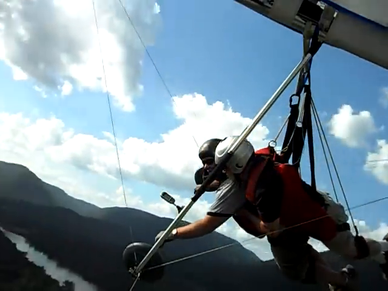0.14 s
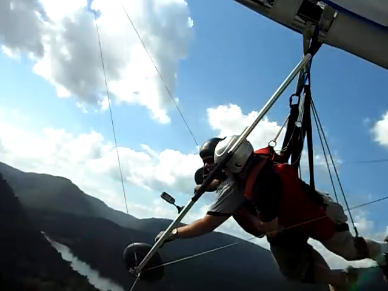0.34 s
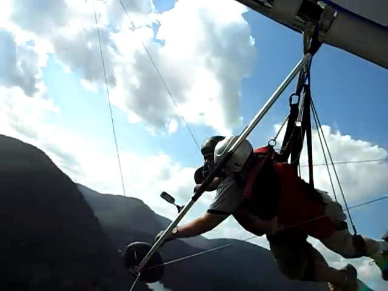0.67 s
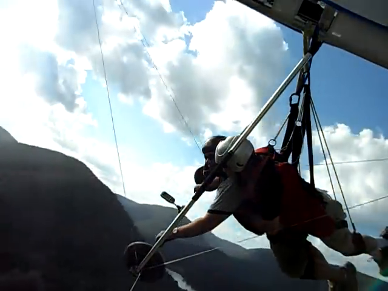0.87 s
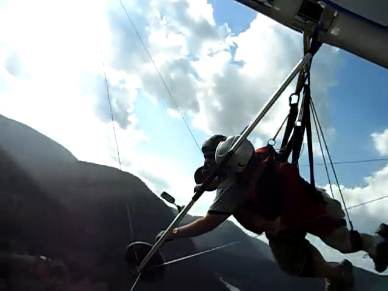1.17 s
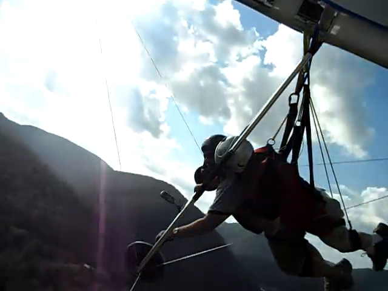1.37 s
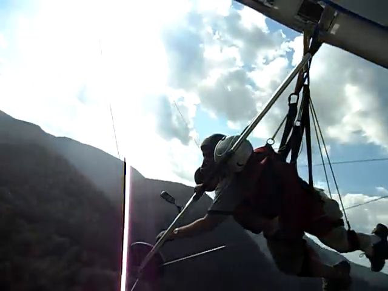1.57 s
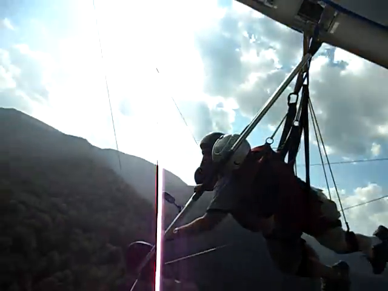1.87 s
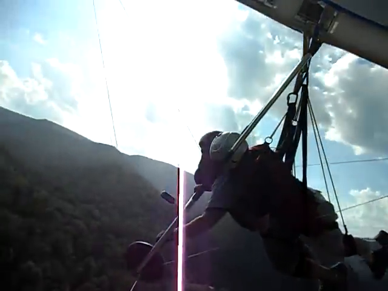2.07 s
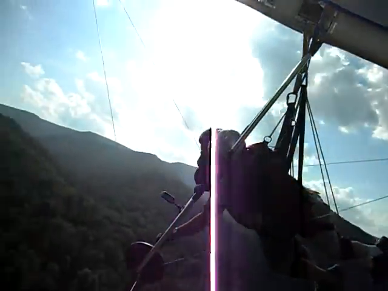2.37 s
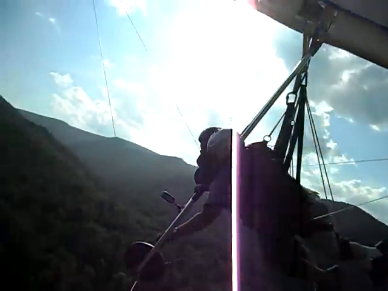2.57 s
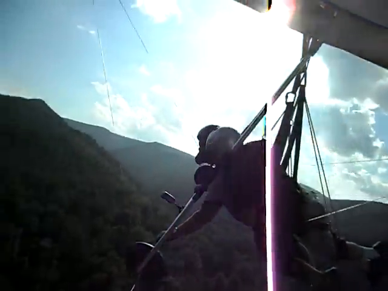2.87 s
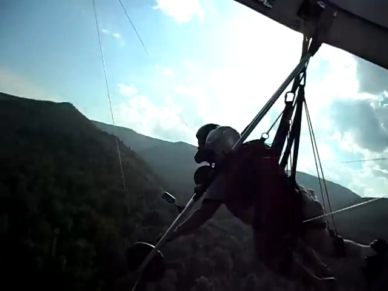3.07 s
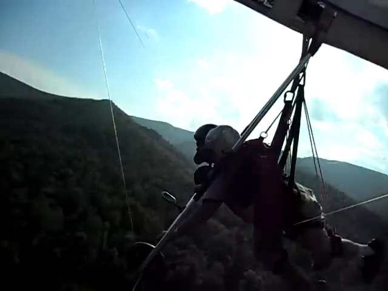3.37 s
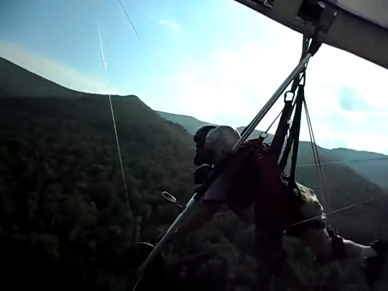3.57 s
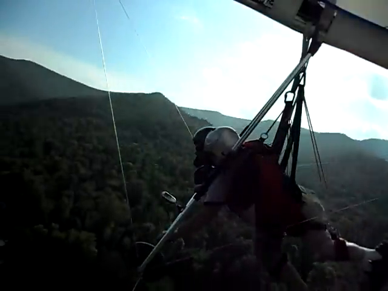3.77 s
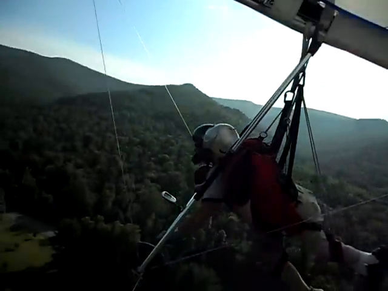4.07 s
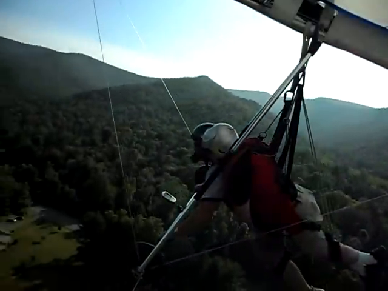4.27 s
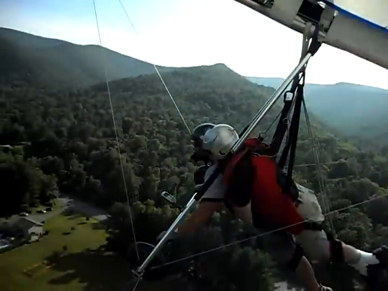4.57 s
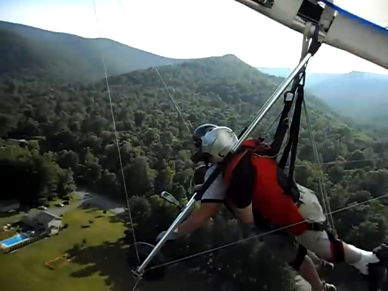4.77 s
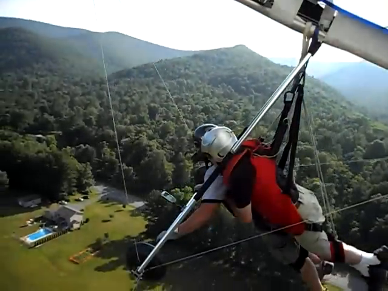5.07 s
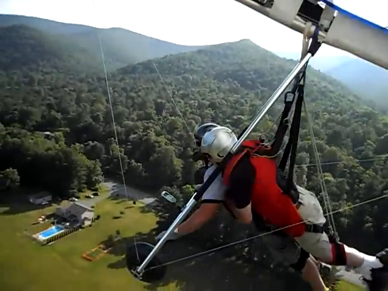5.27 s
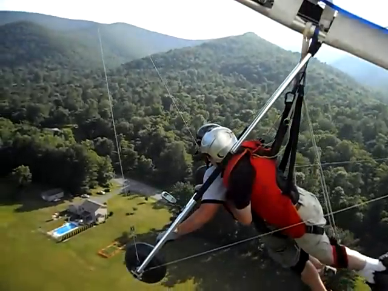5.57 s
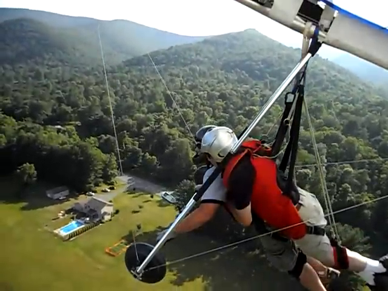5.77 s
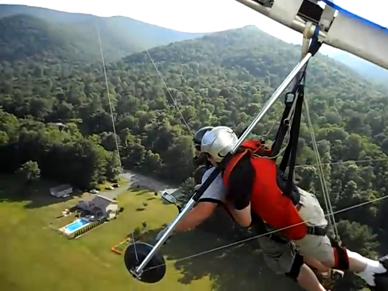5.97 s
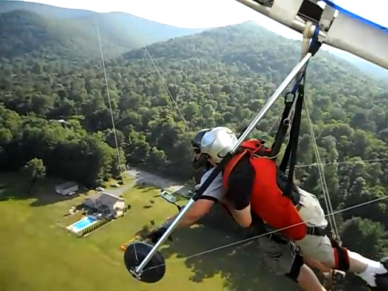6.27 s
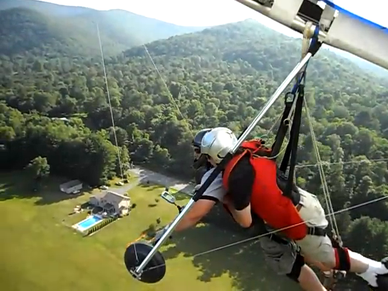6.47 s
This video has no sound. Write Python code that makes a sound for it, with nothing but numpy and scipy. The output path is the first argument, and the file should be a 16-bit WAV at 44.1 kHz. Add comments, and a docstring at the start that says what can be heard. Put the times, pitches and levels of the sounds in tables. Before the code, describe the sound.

Airflow buffets a microphone high in the air, a dull rush that brightens, crackles faintly and briefly breaks into separate gusts.

```python
"""A dull, fluttering rush of wind opens and soon brightens: airflow buffets the microphone of a camera
fixed to a hang glider in flight. Large eddies thump on the port and break into smaller ones, so the
rush sizzles and crackles on their pressure crests. Now and then a sharp pressure spike ticks.
Past the middle the stream breaks into low buffeting, then into separate gusts, and at last settles."""
import sys
import numpy as np
from scipy import signal
from scipy.fft import rfft, irfft
from scipy.io import wavfile
from scipy.ndimage import uniform_filter1d

SR = 44100
rng = np.random.default_rng(int(sys.argv[2]) if len(sys.argv) > 2 else 0)


def transcribe(signal):
    """Save signal, clipped to [-1, 1], as a 16-bit WAV file at the path in sys.argv[1]."""
    frames = np.atleast_2d(signal).T
    limited = np.clip(frames, -1, 1)
    pcm = np.round(limited * 32767).astype(np.int16)
    wavfile.write(sys.argv[1], SR, pcm)


N = 292439
TIME, BINS = np.arange(N) / SR, np.fft.rfftfreq(N, 1 / SR)
CLOCK = TIME[::32]  # coarser time steps for the slow controls

# Strength of the steady stream at the port: (time [s], relative level [dB])
STREAM_LEVEL = [(0, -1.5), (.17, -2), (.22, 1), (.3, 2), (.35, 0.5), (.5, 1), (.57, 3), (.64, 0), (.86, 1),
                (.91, 1), (.99, 3), (1.015, -5), (1.045, -2), (1.08, 0.5), (1.2, 1.5), (1.28, 0.8),
                (1.46, 1), (1.57, -1), (1.66, 1.5), (1.73, -3.5), (1.78, 3.5), (1.85, -0.6), (1.93, 1),
                (2.08, 1), (2.115, -4), (2.19, -2.5), (2.23, -0.5), (2.33, -2.5), (2.49, -0.5), (2.53, -4),
                (2.61, -4.5), (2.69, -2), (2.76, -2), (2.82, 0.7), (3.0, 1), (3.15, -1.2), (3.32, -0.1),
                (3.39, -2.5), (3.45, 2.5), (3.52, -1.5), (3.57, -4), (3.61, 1), (3.69, -2), (3.739, 4.5),
                (3.747, -4.5), (3.83, 0.5), (3.875, -4.5), (3.92, -2.5), (3.97, 0), (4.04, -2), (4.1, 2.5),
                (4.32, 2.5), (4.39, 0.5), (4.47, 3.5), (4.56, 0.5), (4.61, -0.8), (4.7, -1.5), (4.75, -1.5),
                (4.94, 0), (4.99, -3.5), (5.2, -1), (5.25, -4.5), (5.32, -1.5), (5.45, -10), (6.035, -9),
                (6.065, -1.5), (6.17, 0), (6.205, -3.5), (6.24, 0), (6.45, 2.5), (6.51, -2), (6.56, 1.5),
                (6.63, -3)]
# Mean spectrum of the wind pressure: (frequency [Hz], relative spectral density [dB])
WIND_SPECTRUM = [(5, -30.5), (18, -6), (40, -3), (85, 1), (200, 0), (300, -2), (420, -5), (700, -8),
                 (1050, -10.5), (1400, -14), (2300, -20.5), (3300, -31), (5000, -44), (7000, -59),
                 (10300, -76.5)]
# Spectral slope of the rush above ROAR_HZ: (time [s], tilt [dB/octave])
TREBLE_TILT = [(0.0, -7), (0.6, -6), (0.9, -3), (1.2, -0.8), (3.3, 2), (5.0, 0.5), (6.63, 0.06)]
# Single large eddies: (start [s], duration [s], relative level [dB], corner frequency [Hz])
EDDY_THUMPS = [(0.066, 0.12, -1, 219.4), (0.315, 0.043, 2, 220), (2.222, 0.063, 2.5, 259),
               (2.427, 0.06, 3, 200), (2.982, 0.17, 1, 261), (3.27, 0.099, 1.5, 301),
               (3.583, 0.055, 2, 199), (3.712, 0.085, 6.5, 301), (3.811, .035, 2.5, 260),
               (3.955, .1, -0.5, 301), (4.07, 0.25, 0.5, 300), (4.323, 0.071, -2, 299),
               (4.404, 0.048, 5.5, 340), (4.48, 0.16, -1.5, 260), (4.68, 0.077, 0, 320),
               (4.768, 0.055, 2.5, 320), (4.871, .075, 2.5, 299), (5.03, .06, 0.5, 260),
               (5.137, 0.037, 8.5, 261), (5.286, 0.12, 0.5, 240), (5.503, 0.035, -0.5, 220),
               (5.621, 0.067, 4.5, 200), (5.772, 0.051, 7.5, 211), (5.889, .068, 8.5, 190)]
# Tallest pressure spikes: (time [s], peak level in the tick band [dB], corner frequency [Hz])
PRESSURE_SPIKES = [(0.092, -51, 3500), (0.3049, -36.5, 7000), (0.559, -36.5, 8000), (0.5775, -49, 4000),
                   (0.603, -45, 4500), (0.765, -49, 9000), (0.8314, -42, 5500), (0.8539, -38.5, 7500),
                   (0.9655, -40, 7000), (0.9885, -34, 5500), (1.2415, -37, 4400), (1.324, -38, 10000),
                   (1.4436, -40, 5000), (1.4768, -33, 7500), (1.509, -35.5, 4800), (1.549, -45, 12000),
                   (1.8097, -35, 4500), (1.962, -37, 6500), (2.0849, -36.5, 13000), (2.0935, -40, 4500),
                   (2.21, -43, 4500), (2.242, -38, 7500), (2.4932, -34, 6500), (2.902, -36, 5000),
                   (2.9953, -35, 5500), (3.1146, -42, 12000), (3.2067, -40, 4000), (3.319, -41, 12000),
                   (3.4248, -38, 4500), (3.5117, -39, 4500), (3.7226, -37, 4500), (3.7728, -35, 9000),
                   (3.8284, -43, 8000), (4.1296, -36, 5500), (4.2931, -36, 8000), (4.5619, -36, 7000),
                   (4.6314, -39, 5000), (4.6654, -35, 6000), (4.775, -37, 5000), (4.8793, -39, 5500),
                   (5.0508, -38, 5500), (5.1587, -44, 10000), (5.3815, -34, 6000), (5.5333, -39, 5500),
                   (5.6615, -39, 5500), (5.7959, -40, 7000), (5.9184, -37, 4500), (6.4847, -36.5, 9000),
                   (6.5122, -40, 5500)]
# Gusts on top of the stream: (start [s], duration [s], relative level [dB], tilt [dB/octave])
GUST_EVENTS = [(0.938, 0.045, 4.5, 1.5), (1.433, 0.053, -0.5, -0.5), (1.604, 0.036, -5.5, -2),
               (1.861, 0.031, -1, 2), (2.394, 0.032, -2, 3), (2.897, 0.051, -6.5, 1),
               (3.194, 0.051, -5, 1.5), (3.267, 0.093, -5.5, 0), (3.637, 0.039, 3, 1),
               (3.697, 0.046, 1, 0.8), (4.781, 0.037, -3, 3.3), (4.864, 0.1, -5.5, 1.5),
               (5.009, 0.095, 1, 0), (5.121, 0.085, -2, 1), (5.346, 0.12, 1, 0.7), (5.472, 0.11, 0.5, 0.3),
               (5.593, 0.15, -1.5, 0.9), (5.743, 0.11, 0.5, 0.2), (5.873, 0.14, -0.5, 0.5),
               (6.222, 0.049, -4.5, 3), (6.528, 0.044, -4, -0.5)]
# Colouring of the rush during buffeting: (frequency [Hz], gain [dB])
BUFFET_SPECTRUM = [(40.0, 4.5), (120.0, 1.5), (400.0, 0.2), (900.0, -3), (2000.0, -5), (6000.0, 0.6)]
# Faint hiss that ebbs after about a second: (time [s], level [dB])
HISS_LEVEL = [(0, -68.5), (.7, -70), (1.2, -78.5)]

ROAR_HZ, EDGE_HZ = 885, 10600  # pivot of the spectral tilts, upper band limit


def amp(db):
    """Amplitude ratio of a level in decibels."""
    return 10 ** (np.asarray(db) / 20)


def unit_rms(x):
    """Normalisation to a mean power of 1."""
    return x / np.sqrt(np.mean(x ** 2) + 1e-20)


def level_at(spectrum, hz):
    """Interpolation along a logarithmic frequency axis."""
    frequencies, levels = np.transpose(spectrum)
    return np.interp(np.log(hz + 1), np.log(frequencies + 1), levels)


def rolloff(corner_hz, order):
    """Low-pass gain, falling 6 dB per octave for each order."""
    return 1 / (1 + (BINS / corner_hz) ** order)


def filtered(x, gain):
    """Linear filtering as multiplication of the spectrum."""
    return irfft(rfft(x) * gain, N)


def noise(gain):
    """Gaussian noise, coloured by filtering, of rms 1."""
    return unit_rms(filtered(rng.standard_normal(N), gain))


def steadied(x, size=2600):
    """Division by the running rms holds the slow level and keeps the fast flutter."""
    power = uniform_filter1d(uniform_filter1d(x ** 2, size), size // 2)
    return x / np.sqrt(np.abs(power) + 1e-20)


def trapezoid(start, end, attack_s=0.016, release_s=0.02):
    """Envelope of linear attack, hold and release, from 0 to 1."""
    return np.clip(np.minimum((CLOCK - start) / attack_s, (end - CLOCK) / release_s), 0, 1)


def flutter(slow_hz, fast_hz):
    """Turbulent fluctuation: about equal power in each octave between two rates."""
    return noise(BINS / (BINS + slow_hz) ** 1.5 * rolloff(fast_hz, 2))


def flow_gain(hz, exponent_per_octave=0.15, bass_share=0.024):
    """Incoherent sources add in power: stream, gusts and thumps set the envelope near hz."""
    octaves = np.log2(hz / ROAR_HZ)
    stream = amp(np.interp(CLOCK, *np.transpose(STREAM_LEVEL))) ** 2
    exponent = 1 + exponent_per_octave * max(octaves, -1)  # small eddies answer the flow more strongly
    power = (stream + gust_power(octaves)) ** exponent + thump_power(hz)
    tilt = np.interp(CLOCK, *np.transpose(TREBLE_TILT))
    tilt_db = tilt * max(octaves, bass_share * octaves)  # a duller rush also gains a little bass
    gain = np.sqrt(power) * amp(tilt_db + buffeting_db(hz))
    return np.interp(TIME, CLOCK, unit_rms(gain))


def wind(level_db=-21, crest_depth=3.5, burst_depth=3.5, own_depth=3.0, clump_depth=1.06, knee_db=6.5):
    """Turbulent cascade, octave by octave: small eddies burst on the pressure crests of larger ones."""
    colour = amp(level_at(WIND_SPECTRUM, BINS))
    centres = np.geomspace(20, EDGE_HZ, 10)
    bursts = flutter(slow_hz=15, fast_hz=610)  # shared by eddies of all sizes
    clumps = flutter(slow_hz=3.2, fast_hz=22)  # large eddies arrive unevenly
    pressure = np.zeros(N)
    for hz, weights in zip(centres, np.eye(len(centres))):
        band = np.sqrt(np.interp(np.log(BINS + 1), np.log(centres), weights))
        intermittency = hz / (hz + 250)  # large eddies roll smoothly, small ones come in bursts
        riding = hz / (hz + 700)  # the smallest cling most closely to the crests
        crests = unit_rms(filtered(pressure, rolloff(900, 4)))
        unrest = burst_depth * bursts + own_depth * flutter(slow_hz=0.59, fast_hz=119)
        swing = riding * crest_depth * crests + intermittency * unrest
        swing_db = knee_db * np.tanh(swing / knee_db)  # bursts level off
        eddies = steadied(filtered(noise(band) * amp(swing_db), colour))
        eddies = unit_rms(eddies * amp(clump_depth * (1.5 - intermittency) * clumps))
        pressure += np.linalg.norm(band * colour) * eddies * flow_gain(hz)
    return amp(level_db) * unit_rms(pressure)


def fizz(pressure, level_db=-66, swell_hz=600, low_hz=3500, top_hz=7000, buffet_hz=140, choke=2.2):
    """Amplitude modulation: air sizzles through the port on each crest and chokes on the tallest."""
    swell = steadied(filtered(pressure, rolloff(swell_hz, 4)))
    crests = np.tanh(np.maximum(swell, 0) / choke) ** 1.9
    air = noise(BINS / (BINS + low_hz) * rolloff(low_hz, 2) / np.hypot(1, (BINS / top_hz) ** 2))
    drive = flow_gain(low_hz) ** 0.8 * flow_gain(buffet_hz) ** 1.6
    return amp(level_db) * unit_rms(air * crests * drive)


def pulse(size=257, rise_s=0.00022, fall_s=0.0003):
    """A one-sided push on the diaphragm: exponential rise and decay about a central tip."""
    t = (np.arange(size) - size // 2) / SR
    return np.exp(np.minimum(t / rise_s, -t / fall_s))


def crackle(level_db=-46.5, pops_per_s=380, dull_hz=5000, fizz_hz=4300, buffet_hz=140):
    """Shot noise: small pressure pulses at random moments grow with the flow and the buffeting."""
    sizes = amp(4 * np.minimum(rng.exponential(1, N), 3))
    drive = flow_gain(fizz_hz) * flow_gain(buffet_hz) ** 0.4
    arrivals = rng.random(N) < pops_per_s / SR
    pops = signal.oaconvolve(sizes * drive * arrivals, pulse())[:N]
    band = BINS / (BINS + 200) * rolloff(dull_hz, 4)
    return amp(level_db) * unit_rms(filtered(pops, band))


def thump_power(hz):
    """Large eddies vary the pressure slowly, so their power lies mostly below a corner frequency."""
    return sum((amp(db) * trapezoid(start, start + length)) ** 2 / (1 + (hz / corner_hz) ** 3)
               for start, length, db, corner_hz in EDDY_THUMPS)


def spikes(low_hz=500, tick_low_hz=4000, tick_high_hz=10000, size=1024):
    """Time-bandwidth reciprocity: the sharper the tip of a pressure spike, the brighter its tick."""
    hz = np.fft.rfftfreq(size, 1 / SR)
    tick_band = (hz > tick_low_hz) & (hz < tick_high_hz)
    body = rfft(pulse(size)) * hz / np.hypot(hz, low_hz)
    ticks = np.zeros(N)
    for time, db, corner_hz in PRESSURE_SPIKES:
        spectrum = body / np.hypot(1, (hz / corner_hz) ** 3)
        band_peak = irfft(spectrum * tick_band).max()
        start = round(time * SR) - size // 2
        ticks[start:start + size] += amp(db) * irfft(spectrum) / band_peak
    return ticks


def gust_power(octaves):
    """Separate gusts add in power, each with its own spectral slope about the roar."""
    return sum((amp(db + tilt * octaves) * trapezoid(start, start + length)) ** 2
               for start, length, db, tilt in GUST_EVENTS)


def buffeting_db(hz, start_s=3.739, end_s=6.13):
    """Breakdown of the stream into large eddies shifts energy from the midrange to the bass."""
    return level_at(BUFFET_SPECTRUM, hz) * trapezoid(start_s, end_s, attack_s=0.008, release_s=0.26)


def scene():
    """Superposition of the wind pressures at the single microphone port."""
    pressure = wind()
    return (pressure + fizz(pressure) + crackle() + spikes())[None]


def record(dry, asymmetry=0.023, ceiling=0.48, yield_hz=2500, hiss_hz=5000):
    """Nonlinear distortion in the hard-driven diaphragm, then faint hiss and a band limit."""
    square = dry ** 2
    bent = dry + asymmetry * (square - uniform_filter1d(square, size=2000))  # yields more to pushes
    excess = bent - bent / (1 + (bent / ceiling) ** 6) ** (1 / 6)
    rounded = bent - filtered(excess, rolloff(yield_hz, 4))  # the tallest peaks saturate smoothly
    hiss = amp(np.interp(TIME, *np.transpose(HISS_LEVEL))) * noise(1 / np.hypot(1, BINS / hiss_hz))
    low_pass = signal.firwin(255, EDGE_HZ, window=("kaiser", 9), fs=SR)
    return signal.oaconvolve(rounded + hiss, low_pass[None], "same")


dry = scene()
out = record(dry)
transcribe(out)
```